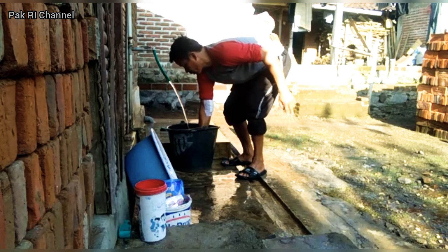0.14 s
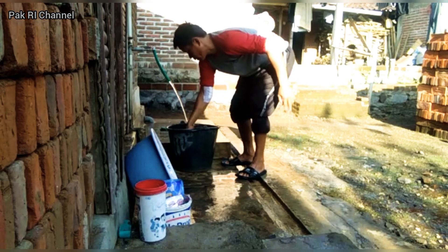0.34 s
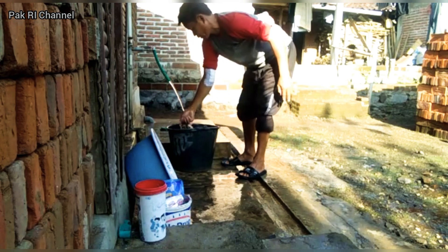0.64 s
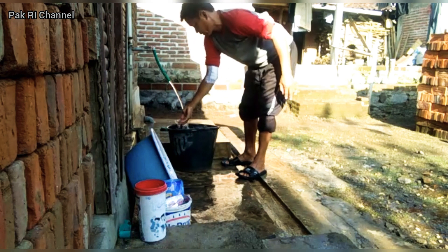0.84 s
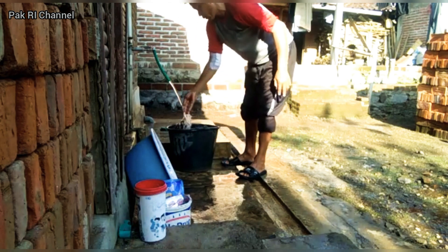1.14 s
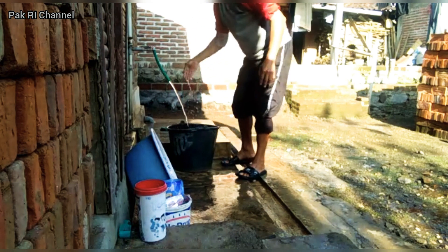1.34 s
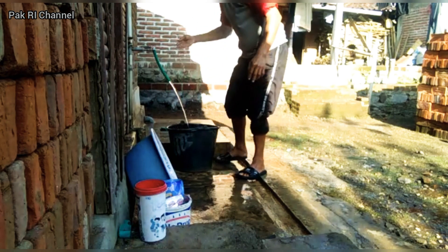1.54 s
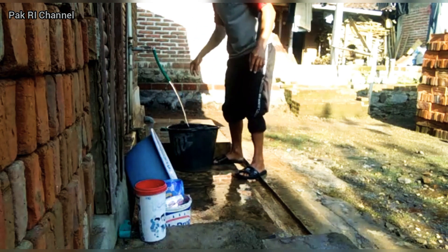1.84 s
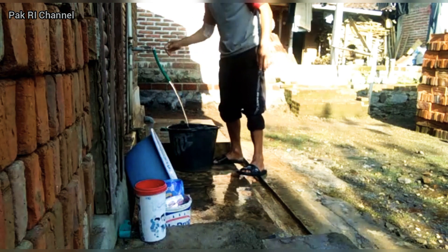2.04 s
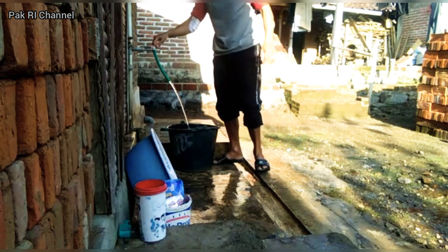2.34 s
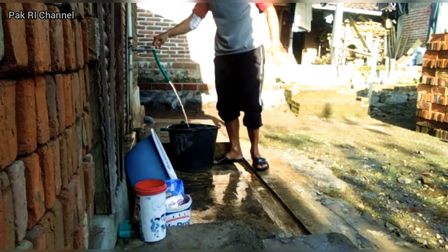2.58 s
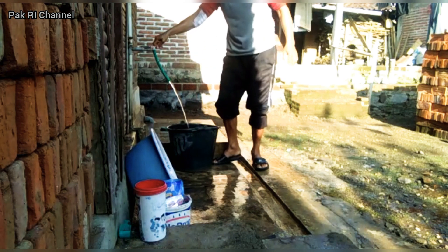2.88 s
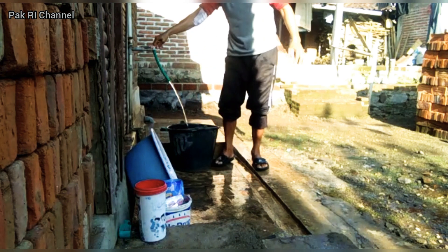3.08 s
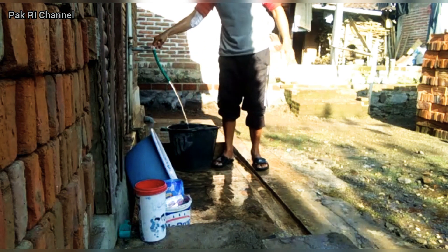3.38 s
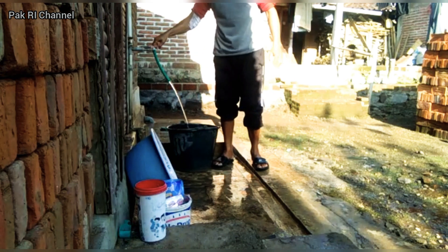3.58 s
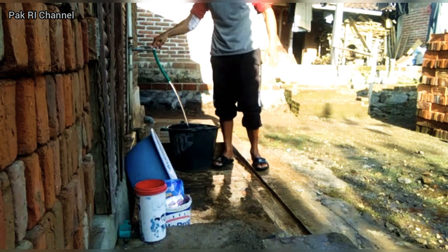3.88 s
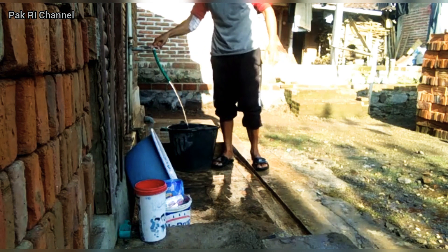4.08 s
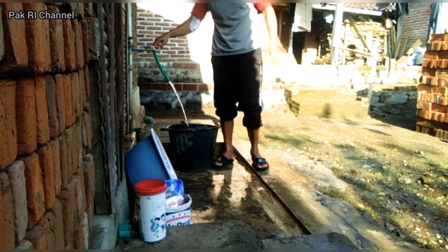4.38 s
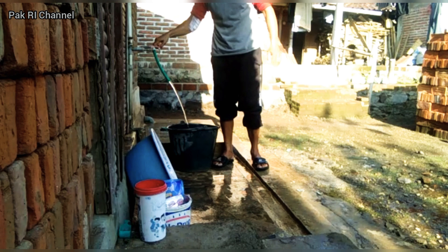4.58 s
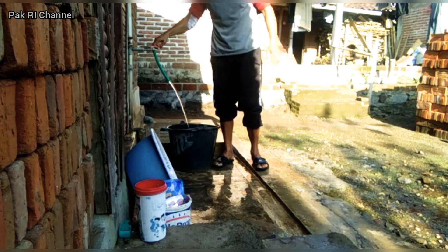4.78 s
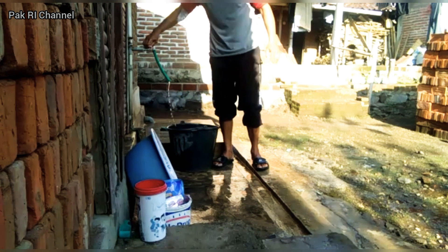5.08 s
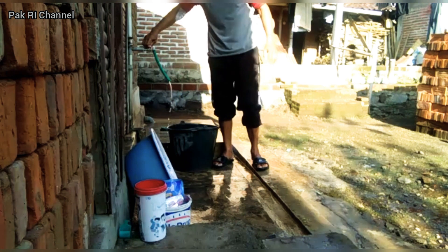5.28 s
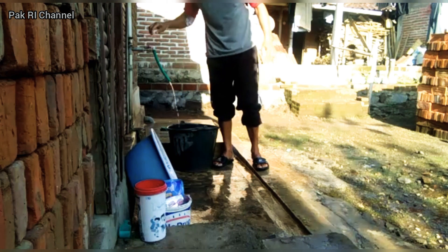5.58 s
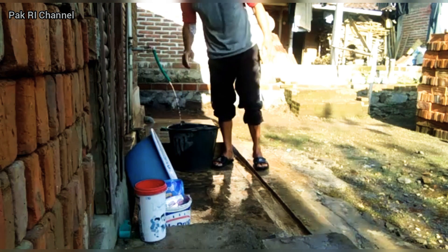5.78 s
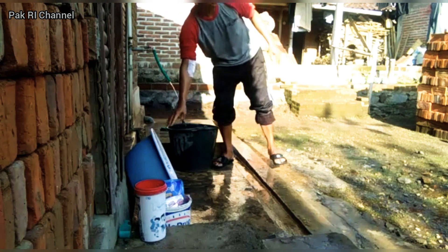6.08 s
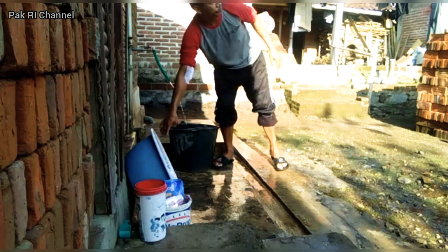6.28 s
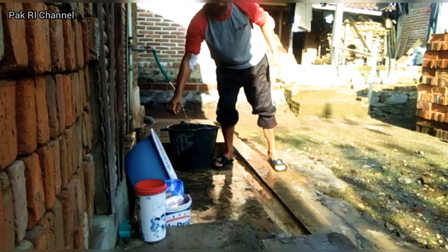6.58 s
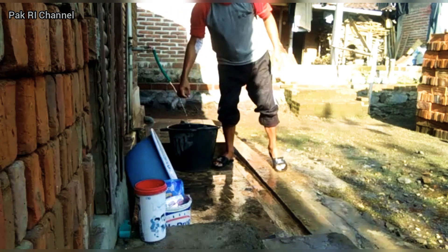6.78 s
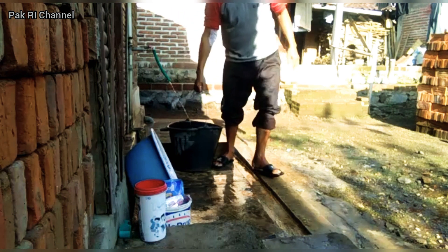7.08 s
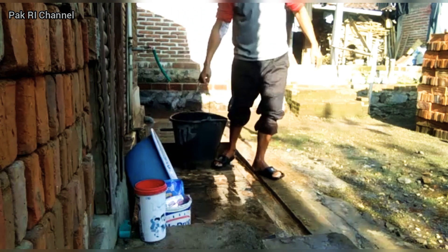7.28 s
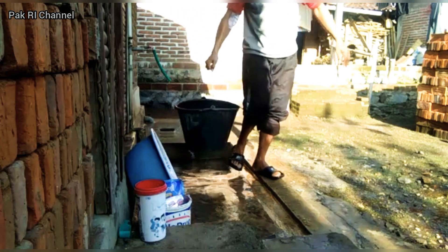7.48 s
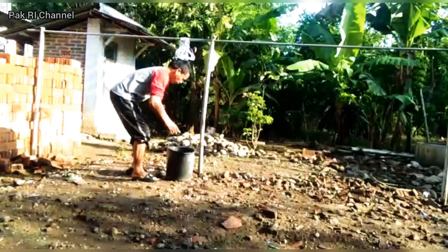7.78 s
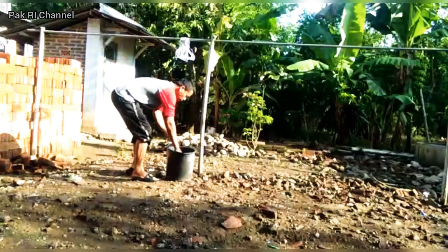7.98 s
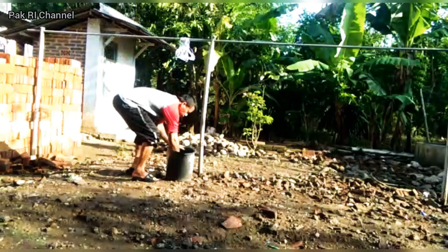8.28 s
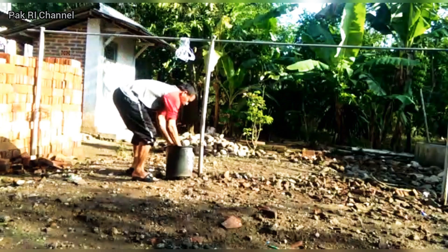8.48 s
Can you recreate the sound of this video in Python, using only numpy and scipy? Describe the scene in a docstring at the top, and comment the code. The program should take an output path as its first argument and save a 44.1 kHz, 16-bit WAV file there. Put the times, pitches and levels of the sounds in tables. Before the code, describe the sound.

A steady splashing jet fills a bucket outdoors, shuts off to drips and a hollow scrape, then louder low engine, crunching bucket and birdsong.

```python
"""A hose pours into a plastic bucket in a walled yard while a hand stirs the water, with a bird note or two.
The tap is shut, the hose dribbles, and the bucket is lifted, scrapes and sloshes. Abruptly, a garden: the
bucket is set down on stony ground and a bird whistles. An engine idles some way off, louder in the garden.
Water is built from bubbles and spray grains, the bucket from grains and wall modes, birds from gliding
sines, the engine from wavering orders of its firing rate, and the open air from shaped noise."""
import sys
import numpy as np
from scipy import signal
from scipy.fft import rfft, irfft
from scipy.io import wavfile
from scipy.ndimage import uniform_filter1d, map_coordinates

SR = 44100
rng = np.random.default_rng(int(sys.argv[2]) if len(sys.argv) > 2 else 0)


def file_out(sig):
    """Save sig as 16-bit WAV at sys.argv[1]."""
    # one column per channel
    cols = np.atleast_2d(sig).T
    # limit, then scale
    lim = np.clip(cols, -1, 1)
    pcm = np.round(lim * 32767).astype(np.int16)
    wavfile.write(sys.argv[1], SR, pcm)


N = 380583
TIME = np.arange(N) / SR
EDGE_HZ = 15650  # top of the band
# the yard background stops, and after an instant the garden background starts
GARDEN_S, SILENCE_S = 7.752, 0.0066

# the jet: base level, its growth as the bucket fills, and the closing of the tap
JET_DB, FILL_DB_PER_S, TAP_SHUT_S, SHUT_FADE_S = -62, 0.5, 5.188, 0.0049
# spectrum of the poured water: (frequency [Hz], relative level [dB per Hz])
POUR_SPECTRUM = [(410, -46), (700, -14.5), (1050, -18), (1920, -8), (3150, -2.3), (4350, -1), (6420, -6),
                 (9110, -22), (12000, -27), (15500, -23)]
# inside of the bucket ringing with the jet: (frequency [Hz], width [Hz], level [dB])
CAVITY_MODES = [(3200, 170, -3.5), (4270, 120, -2), (5030, 35, -18)]
# jet spattering on the hand or as the tap turns, or the hand shielding the water:
# (time [s], length [s], level change [dB])
HAND_MOVES = [(0.062, 0.2, 3.5), (0.457, 0.098, -7), (0.664, 0.48, 4.5), (1.236, 0.08, 5.5),
              (1.845, 0.041, 2), (4.94, 0.057, 2.5)]
HAND_MOVE_S = 0.037
# spectrum of a splat of water: (frequency [Hz], relative level [dB per Hz])
SPLAT_SPECTRUM = [(1000, -18.5), (2000, -3.5), (5500, 5.5), (8500, -17), (13000, -23.5)]
# the hose runs empty in a dribble
DRIBBLE_S, DRIBBLE_LENGTH_S, DRIBBLE_DB = 5.45, 0.614, -65.5
# water stirred by the hand or swinging in the bucket: (time [s], length [s], starting level [dB])
SLOSH_EVENTS = [(0.075, 0.33, -52), (0.74, 0.05, -50), (1.07, 0.038, -46.5), (1.175, 0.054, -51.5),
                (6.67, 0.061, -60), (7.122, 0.081, -53), (7.33, 0.045, -55)]
SLOSH_RISE_S, SLOSH_SAG_DB, SLOSH_FADE_S = 0.035, -6.5, 0.033
# spectrum of the sloshing water: (frequency [Hz], relative level [dB per Hz])
SLOSH_SPECTRUM = [(700, -27), (1200, -7), (2000, -0.5), (3000, -1.5), (5000, -2.5), (6500, -6), (8600, -22),
                  (12000, -33), (15500, -30)]
# loudest gulps and drops:
# (time [s], peak before trim [dB], main bubble pitch [Hz], mean trail of further bubbles [s])
PLOP_EVENTS = [(0.104, -40, 3700, 0.0073), (0.1365, -30.5, 4280, .006), (0.737, -31, 3000, 0.0015),
               (0.7454, -34.5, 5100, 0.0017), (0.7574, -33.5, 4500, .002), (0.8895, -37.5, 3740, .003),
               (0.942, -37, 4730, .002), (0.96, -42, 4750, .003), (0.989, -34, 5300, 0.0011),
               (1.0874, -34, 5400, .007), (1.1, -37, 3860, .007), (1.936, -40.5, 4140, .002),
               (2.7572, -39.5, 4370, 0.004), (3.033, -37, 2330, 0.0019), (3.2248, -39, 4240, 0.0053),
               (4.06, -37.5, 3900, .02), (4.7531, -39.5, 3930, .011), (5.003, -36, 4400, 0.012),
               (5.091, -42, 5100, 0.0052), (5.107, -38.5, 4700, 0.005), (5.5082, -40.5, 3940, 0.0064),
               (5.5408, -44.5, 3895, .008), (5.6269, -48, 6300, 0.0065), (5.6535, -39, 4100, .005),
               (5.756, -45.5, 4450, 0.0053), (5.8087, -49, 4150, 0.006), (5.8627, -45, 6100, 0.0058),
               (6.007, -50, 6760, 0.007), (6.0534, -44.5, 4807, 0.0093), (7.1896, -37, 5700, 0.007),
               (7.377, -44, 5000, 0.0082)]
# lone air pockets in stirred or settling water: (time [s], peak [dB], starting pitch [Hz])
PLINK_EVENTS = [(0.397, -50, 1980), (0.696, -52, 1900), (0.723, -52.5, 1740), (0.764, -39.5, 2050),
                (0.932, -46, 2600), (1.197, -49, 2770), (5.209, -52, 2260), (6.157, -64, 2380),
                (7.1725, -44, 1890), (8.375, -52, 2050)]

# bucket bumped, then meeting the ground and shifted about:
# (time [s], blow level [dB], grit relative to the blow [dB], decay [s])
KNOCK_EVENTS = [(6.325, -46, -5.5, 0.011), (7.889, -28.5, -5.5, 0.019), (7.919, -36.5, -5, .015),
                (7.977, -45, -5, 0.0085), (8.049, -46, 0, .005), (8.06, -33, -7, 0.017),
                (8.083, -43.5, -12, 0.014), (8.18, -52, 3, 0.019), (8.475, -39, -14, 0.017),
                (8.504, -34.5, -7, 0.0052), (8.556, -40.5, -12, 0.0053), (8.572, -43, -14, 0.0081)]
# ringing modes of the plastic wall: (frequency [Hz], relative level [dB], time to fall 60 dB [s])
BUCKET_MODES = [(660, -21, 0.23), (865, -5.5, 0.26), (921, -6.5, 0.15), (1415, -3.5, 0.12),
                (1547, 8.5, 0.05)]
# spectrum of the dull blow: (frequency [Hz], relative level [dB per Hz])
THUD_SPECTRUM = [(150, -15), (250, 2.5), (387, -11.5), (678, -5.5), (753, -9.5), (853, -3.5), (1120, -10.5),
                 (3000, -17.5), (3900, -58), (6600, -120)]
# spectrum of the grit: (frequency [Hz], relative level [dB per Hz])
GRIT_SPECTRUM = [(900, -25), (1800, -4), (4400, 1), (6500, -7), (8500, -26), (12000, -42), (15000, -25)]
# bucket shifting with a hollow scrape:
# (time [s], level before trim [dB], swell [s], fade [s], hollow note relative to the scrape [dB])
SCRAPE_EVENTS = [(0.168, -51, 0.013, 0.029, -21), (6.89, -44, 0.04, 0.04, -2),
                 (7.012, -59, 0.032, 0.085, 7.5), (7.466, -55, 0.0038, 0.0078, -2)]
# the hollow note follows the rocking water up and down
HOLLOW_HZ, ROCK_DEPTH_HZ, ROCKS_PER_S, ROCK_CREST_S = 550, 22, 5.9, 6.975
# spectrum of the scrape: (frequency [Hz], relative level [dB per Hz])
SCRAPE_SPECTRUM = [(140, -17), (250, 1), (400, -7), (680, -6.5), (1100, -12.5), (1600, -11.5),
                   (2000, -27.5), (3700, -20.5), (12000, -75)]
# sharp ticks of the handle and rim: (time [s], peak before trim [dB])
TICK_EVENTS = [(1.6407, -32.5), (7.1264, -42.5)]
# spectrum of a tick: (frequency [Hz], relative level [dB per Hz])
TICK_SPECTRUM = [(400, -17), (900, -13), (1600, 5.5), (2900, 1), (4500, 3), (7200, -5), (12000, -19),
                 (15000, -13.5)]

# bird notes: (time [s], length [s], middle pitch [Hz], glide [Hz], level before trim [dB])
BIRD_NOTES = [(1.46, 0.085, 4833, -250, -60), (3.035, 0.065, 4800, -88, -55.5),
              (7.83, 0.082, 3790, 380, -60), (7.929, 0.1, 2850, -700, -64),
              (8.145, 0.034, 2920, 540, -53.5), (8.177, 0.014, 3580, 105, -56),
              (8.23, 0.055, 3540, 30, -47.5), (8.276, 0.051, 3493, 2, -43),
              (8.336, 0.071, 3523, -15, -43.5), (8.484, 0.038, 4418, 0, -58.5)]
NOTE_ARCH, NOTE_EDGE = 0.0055, 0.54  # pitch bend (fraction) and level exponent of the shared arch

# wavering speed of the engine: (time [s], firing rate [firings per s])
IDLE_SPEED = [(0.0, 29.1), (0.91, 27.5), (1.22, 28.7), (3.0, 28.8), (5.52, 28.3), (6.22, 29.5), (7.3, 28.4),
              (7.37, 29.9), (8.62, 29.3)]
# engine orders in the yard: (multiple of firing rate, relative level [dB])
YARD_ENGINE_ORDERS = [(2, -2), (6, 0.5), (8, -15.5), (9, -17), (10, -13), (11, -10), (12, -14), (15, -19.5)]
# the two strongest engine lines in the yard, before trim:
# (time [s], fourth order level [dB], fifth order level [dB])
LEAD_LEVELS = [(0.0, -58, -54), (0.85, -54, -55.5), (1.35, -70, -54), (2.05, -66, -51.5), (2.7, -60, -53),
               (3.45, -51.5, -52.5), (4.45, -53, -49), (5.15, -57, -50.5), (5.6, -51.5, -49.5),
               (5.85, -43.5, -43.5), (6.15, -47.5, -45.5), (6.5, -51, -61), (6.72, -65, -44),
               (6.9, -53, -63), (7.17, -53, -65), (7.45, -53, -45), (7.75, -55, -50)]
LEAD_SMEAR = 0.053  # their phase waver (radians per order)
THROB_DB, THROB_GROWTH_DB_PER_S = -58.5, 0.32  # the other low orders slowly grow louder
# higher orders in the yard, opening up partway: (time [s], level [dB])
BARK_LEVELS = [(3.2, -67.5), (4.6, -56.5), (5.6, -56), (6.5, -57), (7.75, -58)]
# engine in the garden, before trim: (time [s], low orders level [dB], middle orders level [dB])
GARDEN_ENGINE_LEVELS = [(7.78, -66, -41), (8.012, -53, -38), (8.14, -45.5, -48.5), (8.548, -40.5, -41.5),
                        (8.62, -43, -45)]
# engine orders in the garden: (multiple of firing rate, relative level [dB])
GARDEN_ENGINE_ORDERS = [(2.5, -12), (3, 1), (3.5, -1), (4, -6), (4.5, -4.5), (5, -1), (6, -5), (7, -11)]
# spectrum of the low outdoor rumble: (frequency [Hz], relative level [dB per Hz])
RUMBLE_SPECTRUM = [(20, -27), (40, -3), (58, 2), (95, 9), (130, 5), (220, 0), (330, -7.5), (600, -25),
                   (3000, -83.5)]
# spectrum of the yard air: (frequency [Hz], relative level [dB per Hz])
YARD_AIR_SPECTRUM = [(240, -15), (420, -6), (700, -12.5), (1500, -17), (2700, -22), (6000, -24),
                     (8300, -39), (12500, -45.5), (15500, -40)]
# spectrum of the garden air and rustle: (frequency [Hz], relative level [dB per Hz])
GARDEN_AIR_SPECTRUM = [(180, -8.5), (300, 0), (800, -7), (1500, -11), (2200, -12), (3500, -13.5),
                       (6000, -17), (8500, -34.5), (12500, -45), (15500, -40)]


def pour(slug_db=1.63, spray=0.68, spatter_db=-56, drain_db=-20, drain_s=0.59, cavity_sway=0.012,
         uncovered_s=4.1):
    """The jet drives bubbles under and throws up spray until the tap is shut; on the hand it spatters brightly."""
    jet = froth(per_s=4500, spread_db=2.0, cycles=23, cloud_db=2.5, cloud_s=0.03, cloud_hz=702)
    jet = colour(jet + spray * grains(N, share=0.046, spread_db=-0.5), POUR_SPECTRUM)

    heave = 1 + cavity_sway * wander(hz=3.2)  # the churning surface keeps retuning the hollow
    clear = np.minimum(TIME / uncovered_s, 1)  # the hollow rings more freely as the arm comes out of it
    cavity = sum(amp(db) * resonate(jet, hz * heave, width) for hz, width, db in CAVITY_MODES)
    jet = unit(jet + clear * cavity)

    hand_db = sum(db * burst(s, length, HAND_MOVE_S, HAND_MOVE_S) for s, length, db in HAND_MOVES)
    spray_on_hand = unit(colour(grains(N, share=0.06, spread_db=5.0), SPLAT_SPECTRUM))
    spatter = np.maximum(amp(hand_db) - 1, 0) * spray_on_hand  # only where the hand brightens the jet

    shut_s = np.maximum(TIME - TAP_SHUT_S, 0)
    drain = amp(drain_db) * np.exp(-shut_s / drain_s)  # the hose drains on after the tap is shut
    tap = np.exp(-shut_s / SHUT_FADE_S) + drain
    water = amp(JET_DB + FILL_DB_PER_S * TIME + hand_db) * jet + amp(spatter_db) * spatter
    return amp(slug_db * drift(hz=24.7)) * tap * water


def dribble(rise_s=0.047, fade_s=0.024, clump_db=1.5, spatter=0.45):
    """The last weak flow breaks into separate drips that spatter on the water."""
    drips = froth(per_s=900, spread_db=2.0, cycles=20, cloud_db=1.0, cloud_s=0.013, cloud_hz=1490)
    drips = unit(colour(drips + spatter * grains(N, share=0.0067, spread_db=1.0), POUR_SPECTRUM))
    level = amp(DRIBBLE_DB + clump_db * drift(hz=24))
    return level * burst(DRIBBLE_S, DRIBBLE_LENGTH_S, rise_s, fade_s) * drips


def sloshes(clump_db=2.0, crackle=0.64):
    """Stirred water folds over in a fine crackle of bubbles; each slosh swells, sags and settles."""
    fizz = froth(per_s=4000, spread_db=2.6, cycles=7, cloud_db=3.5, cloud_s=0.012, cloud_hz=810)
    water = colour(fizz + crackle * grains(N, share=0.03, spread_db=3.0), SLOSH_SPECTRUM)
    stir = np.zeros(N)
    for s, length, db in SLOSH_EVENTS:
        sag_db = SLOSH_SAG_DB * np.clip((TIME - s) / length, 0, 1)
        stir += amp(db + sag_db) * burst(s, length, SLOSH_RISE_S, SLOSH_FADE_S)
    return amp(clump_db * drift(hz=30.2)) * stir * unit(water)


def plops(gain_db=-2.0, scatter=0.19, follower=0.68, top_hz=7000, splat_db=-14.5, count=10, size=3500):
    """A drop splats on the water and traps one main bubble and a quick trail of others near its size."""
    out, t = np.zeros(N), np.arange(size) / SR
    for s, db, hz, trail_s in PLOP_EVENTS:
        delay = rng.exponential(trail_s, count)
        pitch = hz * np.exp(scatter * rng.standard_normal(count))
        height = follower * rng.random(count)
        delay[0], pitch[0], height[0] = 0, hz, 1  # the main bubble
        plop = bubbles(delay * SR, np.minimum(pitch, top_hz), height, cycles=7.5, length=size,
                       rise=0.058, start=1.3, size=450)
        spray = grains(size, share=0.15, spread_db=1.5) * np.exp(-t / trail_s)
        splat = colour(spray, SPLAT_SPECTRUM, size=512)
        add(out, s, amp(db + gain_db) * (plop / abs(plop).max() + amp(splat_db) * splat))
    return out


def plinks(cycles=8.6, start=1.6, rise_per_cycle=0.0111, size=4000):
    """A lone pocket of air rings cleanly, its pitch climbing as it rises to the surface."""
    out, t = np.zeros(N), np.arange(size) / SR
    for s, db, hz in PLINK_EVENTS:
        turns = hz * t
        shape = (1 - np.exp(-turns / start)) * np.exp(-turns / cycles)
        ring = np.sin(2 * np.pi * turns * (1 + rise_per_cycle * turns / 2))
        add(out, s, amp(db) * shape / shape.max() * ring)
    return out


def knocks(thud_db=-2, ring_db=-9, grit_lasts=0.6, rise_lasts=0.44, flex=0.64, size=16000):
    """The bucket is knocked or crunches onto stones: a thud, grit, and the ring of the plastic wall."""
    out, t = np.zeros(N), np.arange(size) / SR
    heaviest_db = max(row[1] for row in KNOCK_EVENTS)
    for s, db, grit_db, decay_s in KNOCK_EVENTS:
        onset = np.minimum(t / (rise_lasts * decay_s), 1)  # the stones give way before the full weight lands
        thud = grains(size, share=0.16, spread_db=3.5) * onset * np.exp(-t / decay_s)
        thud = colour(thud, THUD_SPECTRUM)
        grit = grains(size, share=0.092, spread_db=0.0) * onset * np.exp(-t / (grit_lasts * decay_s))
        grit = colour(grit, GRIT_SPECTRUM)
        ring = sum(amp(mode_db - 60 * t / t60) * np.sin(2 * np.pi * (hz * t + rng.random()))
                   for hz, mode_db, t60 in BUCKET_MODES)
        weight = amp(flex * (db - heaviest_db))  # light blows barely flex the wall
        ring = weight * amp(ring_db) * onset * ring
        add(out, s, amp(db) * (amp(thud_db) * thud + ring + amp(grit_db) * grit))
    return out


def scrapes(gain_db=1, width_hz=22, bite=0.41, size=16000):
    """Quick slips of the base shake the bucket, whose hollow note wavers as the water rocks inside."""
    out, t = np.zeros(N), np.arange(size) / SR
    for s, db, swell_s, fade_s, hollow_db in SCRAPE_EVENTS:
        swell = bite + (1 - bite) * np.minimum(t / swell_s, 1)
        stroke = swell * np.exp(-np.maximum(t - swell_s, 0) / fade_s)
        body = colour(stroke * grains(size, share=0.05, spread_db=0.5), SCRAPE_SPECTRUM)
        rocking = np.cos(2 * np.pi * ROCKS_PER_S * (s + t - ROCK_CREST_S))
        hollow = resonate(body, HOLLOW_HZ + ROCK_DEPTH_HZ * rocking, width_hz)
        add(out, s, amp(db + gain_db) * (body + amp(hollow_db) * body.std() * unit(hollow)))
    return out


def ticks(gain_db=7, rattle=0.038, decay_s=0.013, size=3000):
    """The handle or rim gives a hard click with a brief rattle behind it."""
    out, t = np.zeros(N), np.arange(size) / SR
    for s, db in TICK_EVENTS:
        blow = rattle * rng.standard_normal(size) * np.exp(-t / decay_s)
        blow[0] = 1  # the click itself
        tick = colour(blow, TICK_SPECTRUM)
        add(out, s, amp(db + gain_db) * tick / abs(tick).max())
    return out


def birds(gain_db=1.0, quiver=0.003, flutter_db=0.6):
    """Nearly pure notes that swell, arch and glide, with a slight quiver in pitch and level."""
    out, waver = np.zeros(N), 1 + quiver * wander(hz=40.0)
    flutter = amp(flutter_db * drift(hz=70))
    for s, length, hz, glide_hz, db in BIRD_NOTES:
        u = np.linspace(0, 1, round(length * SR))
        arch = 4 * u * (1 - u)
        glide = hz + glide_hz * (u - 0.5)
        pitch = glide * (1 + NOTE_ARCH * (arch - 0.5)) * waver[:len(u)]
        whistle = np.sin(2 * np.pi * np.cumsum(pitch) / SR)
        add(out, s, amp(db + gain_db) * arch ** NOTE_EDGE * whistle)
    return out * flutter


def engine(orders, split_hz, throb_db, bark_db, sway_db, smear):
    """Exhaust beats as a stack of swaying orders: a low throb and a higher bark."""
    rate = np.mean(IDLE_SPEED, axis=0)[1]
    throb, bark = np.zeros((2, N))
    for k, db in orders:
        k = round(2 * k) / 2  # half orders come from uneven firings
        line = amp(db + sway_db * wander(hz=5)) * exhaust_line(k, smear)
        if k * rate < split_hz:
            throb += line
        else:
            bark += line
    return amp(throb_db) * unit(throb) + amp(bark_db) * unit(bark)


def exhaust_line(k, smear):
    """One order of the exhaust beat, rms 1; the air path delays it and makes it waver, the high orders most."""
    turns = np.cumsum(np.interp(TIME, *np.transpose(IDLE_SPEED))) / SR
    path = 2 * np.pi * rng.random() + 0.64 * wander(hz=1)  # reflections shift slowly in the breeze
    return unit(np.cos(2 * np.pi * k * turns + path + smear * k * wander(hz=5)))


def yard(rumble_db=-55.5, air_db=-65.5, air_growth_db_per_s=0.67, lead_db=-3.5, lead_sway_db=2.17):
    """The far engine with its two leading orders, low rumble and slowly growing open air."""
    motor = engine(YARD_ENGINE_ORDERS, split_hz=220, throb_db=THROB_DB + THROB_GROWTH_DB_PER_S * TIME,
                   bark_db=np.interp(TIME, *np.transpose(BARK_LEVELS)), sway_db=2.5, smear=0.071)
    s, *levels = np.transpose(LEAD_LEVELS)
    for k, db in zip((4, 5), levels):
        line_db = np.interp(TIME, s, db) + lead_db + lead_sway_db * wander(hz=9)
        motor += amp(line_db) * exhaust_line(k, LEAD_SMEAR)
    air_level = amp(air_db + air_growth_db_per_s * TIME + 1.3 * wander(hz=8))
    return motor + amp(rumble_db) * noise(RUMBLE_SPECTRUM) + air_level * noise(YARD_AIR_SPECTRUM)


def garden(rumble_db=-49, air_db=-56.5, rustle_db=-62.5, clump_db=2.0, low_db=-1.0, middle_db=-0.5):
    """The engine is louder here, and the stony ground rustles underfoot as clumped grains."""
    s, low, middle = np.transpose(GARDEN_ENGINE_LEVELS)
    motor = engine(GARDEN_ENGINE_ORDERS, split_hz=115, throb_db=np.interp(TIME, s, low) + low_db,
                   bark_db=np.interp(TIME, s, middle) + middle_db, sway_db=1.7, smear=0.057)
    pebbles = grains(N, share=0.02, spread_db=2.5)
    rustle = unit(colour(amp(clump_db * drift(hz=25)) * pebbles, GARDEN_AIR_SPECTRUM))
    air = amp(air_db + wander(hz=8.7)) * noise(GARDEN_AIR_SPECTRUM)
    return motor + amp(rumble_db) * noise(RUMBLE_SPECTRUM) + air + amp(rustle_db) * rustle


def noise(spectrum):
    """Even noise of rms 1 with the given spectrum."""
    return unit(colour(rng.standard_normal(N), spectrum))


def walls(x, echo_db, tail_db, t60, echo_s=0.01, shift_hz=2.3, size=22000, count=3):
    """One slap from the near wall and a scattered tail whose paths keep changing."""
    t = np.arange(size) / SR
    out = x.copy()
    add(out, echo_s, amp(echo_db) * x)
    for k in range(count):
        scatter = rng.standard_normal(size) * (rng.random(size) < 0.1)
        tail = scatter * amp(-60 * t / t60) * (t > 0.002)
        share = np.sqrt(2 / count) * np.cos(np.pi * (shift_hz * TIME + k / count))
        out += amp(tail_db) * signal.oaconvolve(x * share, tail / np.linalg.norm(tail))[:N]
    return out


def froth(per_s, spread_db, cycles, cloud_db, cloud_s, cloud_hz):
    """A crowd of tiny bubbles of all pitches; they come in brief clouds of like size."""
    clouds = rng.standard_normal((1024, 64))  # loudness over time and pitch
    when, pitch, big = rng.random((int(per_s * N / SR), 3)).T
    hz = 500 + pitch * (EDGE_HZ - 500)
    cloud = map_coordinates(clouds, [when * N / SR / cloud_s, hz / cloud_hz], order=1, mode="wrap")
    height = amp(spread_db * np.minimum(-np.log(1 - big), 4) + cloud_db * cloud)
    return unit(bubbles(when * N, hz, height, cycles, N))


def bubbles(at, hz, height, cycles, length, rise=0.083, start=0.55, size=320):
    """Each bubble is a sine that starts softly and dies, its pitch creeping up as it nears the surface."""
    k = np.arange(size)
    turns = hz[:, None] * k / SR
    shape = (1 - np.exp(-turns / start)) * np.exp(-turns / cycles) * (1 - k / size)
    ring = np.sin(2 * np.pi * turns * (1 + rise * k / size)) * shape
    ring *= (height / np.linalg.norm(ring, axis=1))[:, None]
    place = at[:, None].astype(int) + k
    return np.bincount(place.ravel(), ring.ravel(), length + size)[:length]


def grains(length, share, spread_db):
    """Sparse clicks of uneven size, rms 1."""
    height = amp(spread_db * np.minimum(rng.exponential(1, length), 4))
    return unit(height * rng.standard_normal(length) * (rng.random(length) < share))


def resonate(x, hz, width):
    """A resonance of gain 1 that follows the pitch curve hz."""
    turn = np.exp(2j * np.pi * np.cumsum(hz) / SR)
    r = np.exp(-np.pi * width / SR)
    # shift the note to 0 Hz, smooth, and shift back
    return 2 * (turn * signal.lfilter([1 - r], [1, -r], x / turn + 1e-18)).real


def colour(x, spectrum, size=4096):
    """Causal (minimum-phase) filter of unit energy with the given spectrum."""
    hz, db = np.transpose(spectrum)
    f = np.fft.rfftfreq(size, 1 / SR) + 1
    log_gain = np.log(amp(np.interp(np.log(f), np.log(hz), db)))
    circle = np.concatenate([log_gain, log_gain[-2:0:-1]])
    taps = np.fft.ifft(np.exp(np.conj(signal.hilbert(circle)))).real[:size // 2]
    return signal.oaconvolve(x, taps / np.linalg.norm(taps))[:len(x)]


def burst(start, length, rise_s, fade_s):
    """Attack, hold and release, as a gain over time."""
    attack = np.clip((TIME - start) / rise_s, 0, 1)
    return attack * np.exp(-np.maximum(TIME - start - length, 0) / fade_s)


def drift(hz):
    """Random drift of rms 1, moving up to about hz times a second."""
    f = np.fft.rfftfreq(N, 1 / SR)
    return unit(irfft(rfft(rng.standard_normal(N)) / (1 + (f / hz) ** 4), N))


def wander(hz, count=12):
    """A smooth random sway of rms 1: a few sines slower than hz."""
    t = TIME[::400]
    sway = sum(np.sin(2 * np.pi * (hz * a * t + b)) for a, b in rng.random((count, 2)))
    return np.interp(TIME, t, unit(sway))


def amp(db):
    """Decibels to gain."""
    return 10 ** (np.asarray(db) / 20)


def unit(x):
    """Scales to rms 1."""
    return x / np.sqrt(np.mean(x ** 2) + 1e-20)


def add(mix, s, sound):
    """Mixes a sound in at time s."""
    part = mix[max(round(s * SR), 0):][:len(sound)]
    part += sound[:len(part)]


def scene():
    """Water, bucket and birds over the background of each place."""
    wet = pour() + dribble() + sloshes() + plops() + plinks() + ticks()
    water = walls(wet, echo_db=-18.0, tail_db=-6.5, t60=0.061)
    bucket = walls(knocks() + scrapes(), echo_db=-11, tail_db=-6.5, t60=0.59)
    song = walls(birds(), echo_db=-23, tail_db=-9.5, t60=0.52)
    in_yard = uniform_filter1d((TIME < GARDEN_S - SILENCE_S) * 1., size=60)
    in_garden = uniform_filter1d((TIME > GARDEN_S) * 1., size=20)
    return (water + bucket + song + in_yard * yard() + in_garden * garden())[None]


def record(dry):
    """The microphone loses the deepest bass; then the band limit."""
    thin = signal.sosfilt(signal.butter(2, 35, "high", fs=SR, output="sos"), dry)
    edge = signal.firwin(511, EDGE_HZ, window=("kaiser", 9), fs=SR)
    return signal.oaconvolve(thin, edge[None], "same")


dry = scene()
out = record(dry)
file_out(out)
```